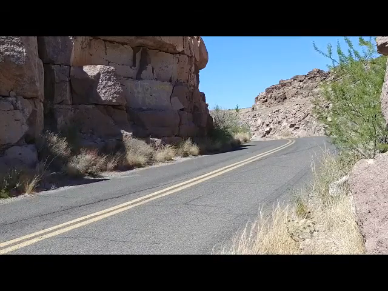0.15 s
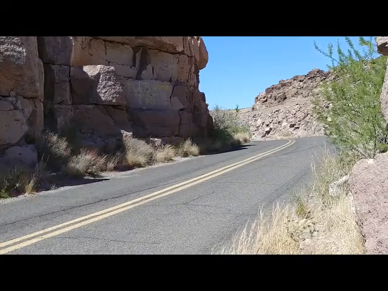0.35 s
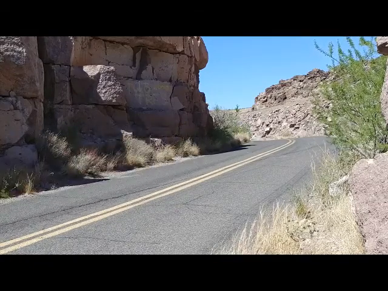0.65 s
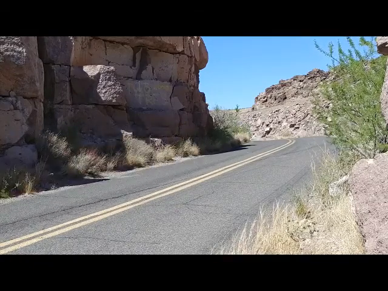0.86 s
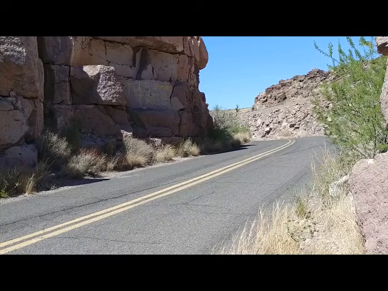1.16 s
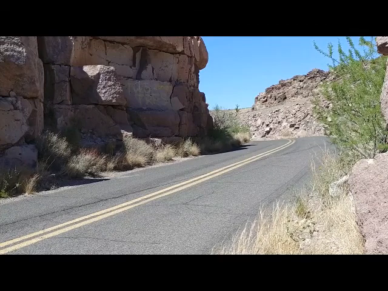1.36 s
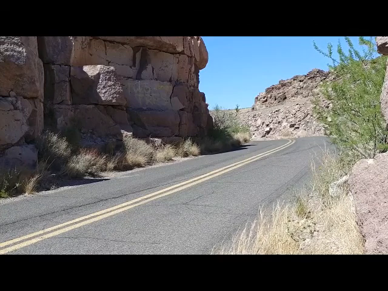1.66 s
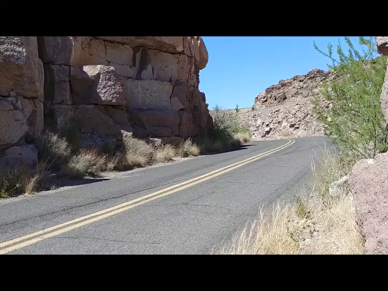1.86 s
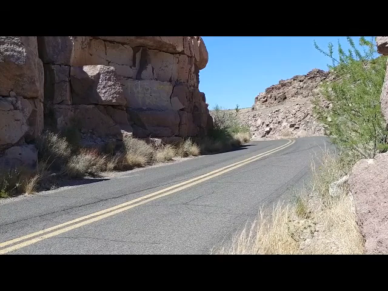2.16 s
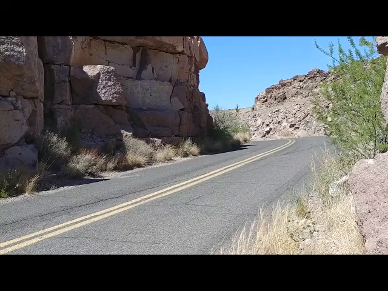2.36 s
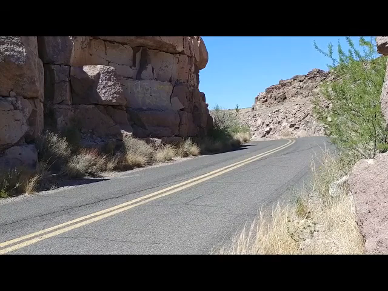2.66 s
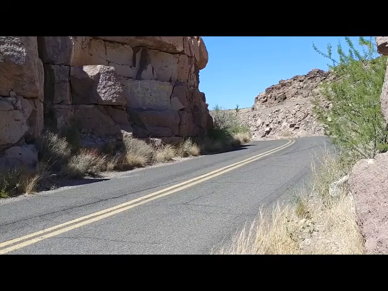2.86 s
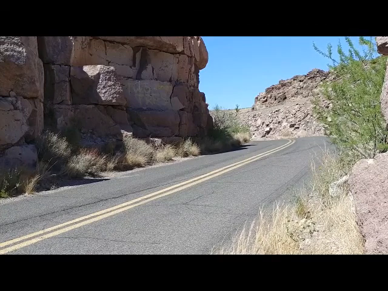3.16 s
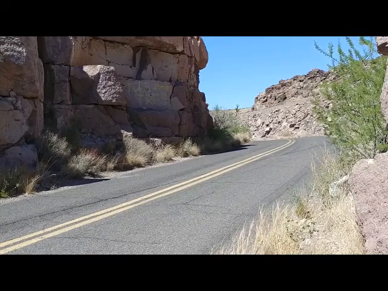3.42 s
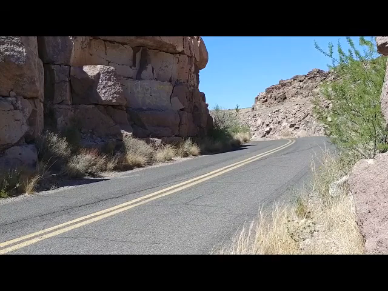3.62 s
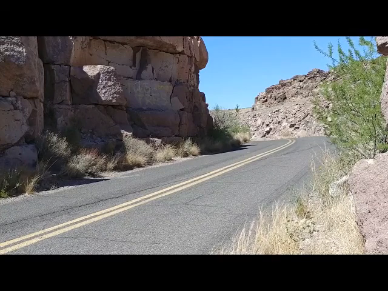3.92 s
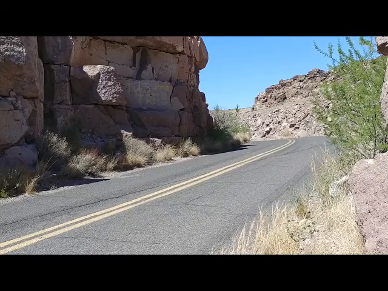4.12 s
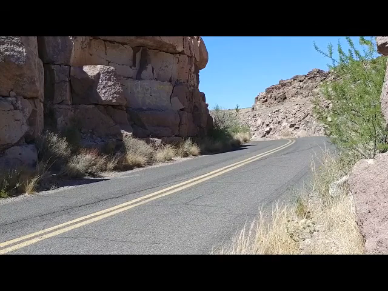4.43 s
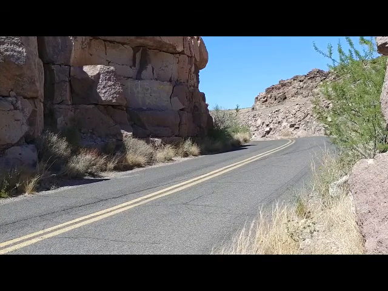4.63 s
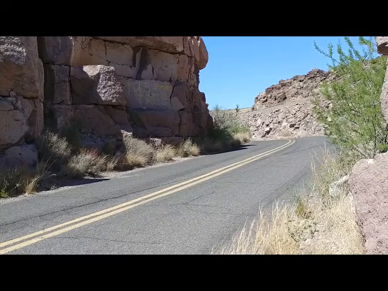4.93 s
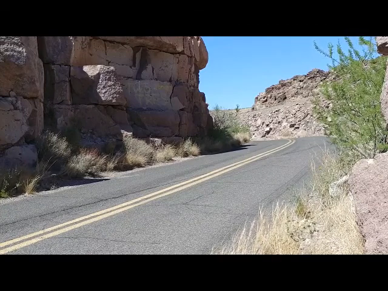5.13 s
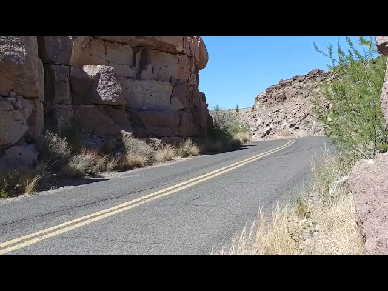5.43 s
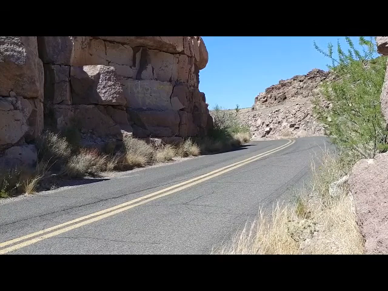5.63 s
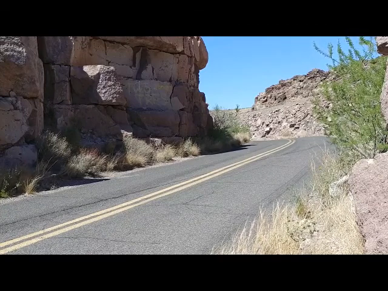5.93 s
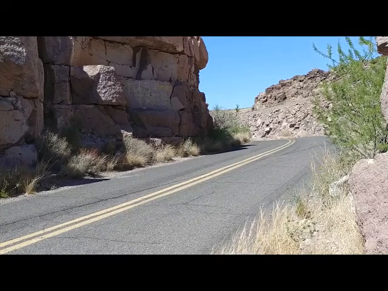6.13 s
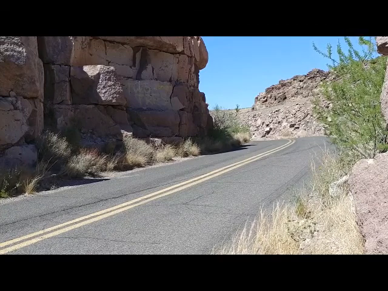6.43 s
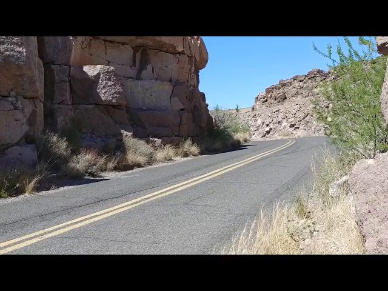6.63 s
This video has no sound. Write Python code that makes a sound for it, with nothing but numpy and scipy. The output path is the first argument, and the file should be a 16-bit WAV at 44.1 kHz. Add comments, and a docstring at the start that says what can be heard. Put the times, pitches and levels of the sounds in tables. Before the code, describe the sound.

Loud open-pipe small bike passes, chugging and rattling off throttle, cracks four echoing backfires between rock walls, then fades to soft putts and microphone wind buffeting.

```python
"""A small single-cylinder bike with an open pipe passes close by on a canyon road and rolls away.
Under throttle each firing pulse makes the pipe bark; the throttle shuts with a spit of the intake.
It coasts past: suction pulses chug in the pipe, valves and teeth rattle the case, a sharp tick sounds.
Unburnt fuel backfires four times with cracks, rasp and roar that the rocks throw back.
Soft lone firings then putter on far off, while low-frequency gusts buffet the left microphone."""
import sys
import numpy as np
from scipy import signal
from scipy.fft import rfft, irfft, next_fast_len
from scipy.io import wavfile

SR = 44100
rng = np.random.default_rng(int(sys.argv[2]) if len(sys.argv) > 2 else 0)


def pcm_store(signal):
    """Save signal as 16-bit PCM."""
    levels = np.round(np.clip(np.atleast_2d(signal), -1, 1) * 32767)
    wavfile.write(sys.argv[1], SR, levels.astype(np.int16).T)


N = 298998
TIME = np.arange(N) / SR
SIZE = next_fast_len(N + SR, real=True)
HZ = np.maximum(np.arange(SIZE // 2 + 1) * SR / SIZE, 1)

# All levels are relative: further gains follow in the functions.
# engine speed, near steady then running down: t/s, rate/cycles per s
SPEED = [(0, 42.35), (.58, 43.05), (.68, 40.3), (1.45, 38.54), (2.05, 36.1), (2.5, 32.92), (3.3, 29.2),
         (4.3, 24.06), (6.78, 21)]
# effort under throttle: t/s, bark level/dB, hiss level/dB
DRIVE = [(.17, -10, -21), (.36, -20, -32.5), (.62, -19, -35.5)]
# backfires: t/s, crack level/dB, roar level/dB, rasp level/dB, hot pipe f/Hz
BACKFIRES = [(2.159, -8, -12.5, -24.5, 800), (2.4522, -4, -14.5, -29, 800),
             (2.703, -17.5, -20.5, -44, 1030), (2.9152, -6, -14, -25.5, 920)]
# last pocket of fuel after the big bang: t/s, level/dB
AFTER_THUMPS = [(2.9815, -5)]
# lone far firings as the engine falls to idle: t/s, level/dB
PUTTS = [(3.893, -27), (4.3, -31), (4.431, -40), (4.563, -36), (4.703, -33.5), (4.898, -35), (5.145, -39),
         (5.286, -34.5), (5.384, -46), (5.497, -37), (5.61, -43.5)]
# gust peaks: t/s, level/dB
GUSTS = [(4.118, -21.5), (4.3, -35), (4.529, -16.5), (4.98, -19.5), (5.268, -19.5), (5.55, -23.5),
         (6.15, -44), (6.559, -28), (6.731, -23)]
# rock echo against direct sound: t/s, level/dB
ROCK_ECHO = [(0, -9.5), (1.2, -6.5), (3.7, -7), (4.4, 0.5)]
# far rock faces answering the backfires: delay/s, level/dB
FAR_ECHOES = [(.1, -15), (.3, -21), (.42, -13), (.6, -19)]
# radiation of each part: facing t/s, level/dB, loss per distance doubling/dB, loss behind rock/dB
CHUG_BEAM = (1.5, -13.5, 9.5, 21)
RING_BEAM = (1.38, -11.5, 13, 11.5)
CLATTER_BEAM = (1.78, -19.5, 12.5, 12)
HISS_BEAM = (1.11, -25, 10.5, 2)
# pipe modes under throttle, upper and deepest: f/Hz, width/Hz, level/dB
BARK_MODES = [(495, 56, 6.5), (578, 28, -2)]
BARK_DEEP_MODE = [(373, 35, 6.8)]
# engine case and pipe wall modes: f/Hz, width/Hz, level/dB
CLATTER_MODES = [(838, 173, 13.5), (1284, 100, 20), (1470, 110, 12.5), (1746, 100, 16.5), (1950, 42, 5.5),
                 (2430, 350, 3.5), (2910, 220, 8), (3240, 210, -10)]
# pipe wall buzz mode: f/Hz, width/Hz, level/dB
BUZZ_MODES = [(2420, 370, 0)]
# spectrum of the firing crack under load: f/Hz, level/dB
BARK_CRACK = [(80, -14.5), (220, 3), (580, 0.5), (780, -9.5), (1130, 2), (1450, -2.5), (1950, -11.5),
              (2850, -34), (6000, -43)]
# spectra of the coasting chug, near and far: f/Hz, level/dB
CHUG_NEAR = [(30, -20), (70, -12), (110, -2), (155, 1.5), (215, -7), (330, -2.5), (480, -3), (750, -37),
             (1500, -56.5)]
CHUG_FAR = [(35, -40.5), (75, -14), (115, 4.5), (165, 2), (210, -2.5), (265, -0.5), (310, -26),
            (430, -23.5), (620, -17), (740, -21.5), (800, -30.5), (1500, -54)]
# spectrum of the coasting pipe ring: f/Hz, level/dB
PIPE_RING = [(150, -32.5), (300, -30), (385, 11.5), (450, 3.5), (560, 3.5), (680, -17), (900, -18),
             (2000, -72)]
# spectrum of the clatter from behind: f/Hz, level/dB
FAR_CLATTER = [(700, -7), (1100, 5.5), (1300, -6), (1550, 4.5), (1750, -6), (2150, -10.5), (2600, -25.5),
               (3300, -17.5), (4500, -45), (7000, -37.5), (9000, -33.5)]
# spectrum of chain and tyre hiss: f/Hz, level/dB
HISS = [(2000, 2), (3300, -0.5), (4500, -2.5), (5800, -0.5), (7100, -6), (8400, 2.5), (9600, 1.5),
        (10700, -16), (12000, -8.5), (15500, -14)]
# spectrum of the sharp bright tick: f/Hz, level/dB
TICK = [(2000, -18), (7000, -3), (16000, 0)]
# spectra of backfire crack, roar and rasp: f/Hz, level/dB
CRACK = [(40, -21.5), (120, 2.5), (300, 1), (550, -6.5), (1000, -17), (3000, -25), (5000, -67.5),
         (9000, -33.5), (11500, -69.5)]
ROAR = [(80, -14), (250, 3.5), (550, 18), (900, 1), (1400, -16), (3000, -24.5), (4500, -41.5), (11000, -65)]
POP_RASP = [(500, -26), (1200, 1), (2100, 0.5), (3200, -4.5), (4500, -19.5), (7200, -23.5), (9500, -14),
            (11000, -52)]
# spectrum of the lone firings: f/Hz, level/dB
PUTT = [(60, 2.5), (200, 10.5), (310, -6), (430, 3), (580, 7), (740, -17), (950, -8.5), (1300, -33.5),
        (2200, -46), (4000, -67)]
# spectrum of the far rock faces: f/Hz, level/dB
FAR_ECHO_COLOUR = [(300, -6.5), (900, -9.5), (1600, 1), (2300, -4), (2800, -10.5), (4500, -22)]
# spectra of wind buffet and still air: f/Hz, level/dB
WIND = [(20, -25.5), (45, -1), (70, 5), (120, -2), (220, -11), (330, -27.5), (700, -42.5), (2000, -80)]
AIR = [(30, -15.5), (150, 2.5), (550, -0.5), (800, -35), (4000, -35), (15000, -44)]
# lead of the left microphone: f/Hz, phase/rad
PORT_PHASE = [(40, 0), (200, .45), (620, .8), (950, 2.8), (1720, 4.2), (2500, 6.3), (3450, 11), (16000, 51)]

# wind
GUST_RISE_S, GUST_FALL_S = 0.052, 0.075
BREEZE_RISES_S, BREEZE_RISE_TAKES_S = 3, 0.71
BREEZE_DB, BREEZE_FADE_DB_PER_S, BREEZE_DROPS_S = -30.5, 6, 4.98
# canyon; bangs carry to farther rocks and ring longer
CANYON_T60_S, CANYON_DULL_HZ = 0.41, 2967
BANG_ECHO_DB, BANG_T60_S, BANG_DULL_HZ = -5.5, 0.43, 3580
# time to cover the closest distance; later a rock shoulder hides the bike
PASS_WIDTH_S, HIDDEN_FROM_S, HIDING_TAKES_S = 0.86, 3.9, 1.77
# rider and frame screen the hiss from behind
HISS_SCREEN_DB, SCREEN_FROM_S, SCREEN_TAKES_S = 21, 2.5, 0.17
TICK_S, TICK_DB = 1.439, -10
# lone firings settle into an even beat
IDLE_FROM_S, IDLE_PERIOD_S, IDLE_DB = 5.715, .14, -43.5
# engine
THROTTLE_SHUT_S, FIRST_CYCLE = .655, .262
DRIVE_CHUG_DB, DRIVE_CLATTER_DB = -31, -47.5
# intake spit as the throttle snaps shut
SNAP_DB, SNAP_FALL_S = -23, 0.0062
TOP_DULLS_S, TOP_DULLING_TAKES_S = 1.8, 0.1
SPIT_IN_HISS, CLACK_IN_HISS = 2.8, 3.8
BUZZ_DB, BUZZ_FACING_S, BUZZ_WIDTH_S, BUZZ_FALL_S = -32.5, 1.83, 0.24, .0035
SPIT_IN_RATTLE, CLACK_IN_RATTLE, VALVE_KNOCK, TEETH_SHARE = 2.9, 6.5, 5.3, 1.15
ROAD_DULL_HZ = 2300
# moving air makes the far clatter flutter
FLUTTER_DB, FLUTTER_PER_S = 2.5, 14
# treble dip after each backfire
HUSH_DB, HUSH_AFTER_S, HUSH_WIDTH_S = 8, 0.061, 0.025
# backfires
BURN_PEAK_S, BURN_WIDTH_S, BURN_TAIL, BURN_TAIL_S, PIPE_TONE = 0.025, .016, 0.2, 0.055, 0.95
THUMP_DULL_HZ, COOL_PIPE_HZ = 700, 500
PIPE_RETURN_S = .0077
# boom at twice the firing rate
BOOM_FROM_S, BOOM_UNTIL_S, BOOM_EDGE_S = 1.48, 3.07, 0.1347
BOOM_DB, BOOM_SAG_DB_PER_S, BOOM_OFF_AXIS_DB, BOOM_LEAD_RAD = -15.5, 8.5, -30, .5
# bark
DEEP_EASES_DB, DEEP_EASES_S = 10.5, 0.36
BARK_CRACK_DB, CRACK_SWING_HZ = -23, 1100
BARK_UNEVEN_DB, BARK_UNEVEN_PER_S = 1.4, 30
# rock face answering the bark as the bike draws nearer
FACE_DB, FACE_FROM_S, FACE_TAKES_S, FACE_DULL_HZ = -9.5, .2, .2, 700
FACE_DELAY_S, FACE_CLOSES_S_PER_S = .0143, .0018
# pulses and wake; the lowest pipe mode drones between chugs
WAKE_STEADY, WAKE_FALL_S, WAKE_DB, PULSE_TOP_HZ, CLEAN_BELOW_HZ = 0.85, 0.0023, -31, 3060, 190
DRONE_HZ, DRONE_WIDTH_HZ, DRONE_DB = 168.3, 28, -4.5
# rocks draw far chugs out, higher tones arriving later
FAR_SMEAR_S_PER_HZ = .000012
# gain control on mean power
LIMIT_DB, LIMIT_WINDOW_S, LIMIT_RELEASE_DB_PER_S = -9.5, 0.0064, 89


def from_db(db):
    """Decibels to gain."""
    return 10 ** (np.asarray(db) / 20)


def rms_one(x):
    """Scale to unit power."""
    return x / np.sqrt(np.mean(x ** 2) + 1e-20)


def in_time(rows):
    """Each column of a curve at every sample."""
    s, *columns = np.transpose(rows)
    return [np.interp(TIME, s, c) for c in columns]


def ramp(start_s, length_s):
    """Rise from 0 to 1 over `length_s`."""
    return np.clip((TIME - start_s) / length_s, 0, 1)


def filtered(x, response):
    """Apply a frequency response."""
    return irfft(rfft(x, SIZE) * response, SIZE)[..., :N]


def colour(points):
    """Causal (minimum-phase) response with the given spectrum."""
    hz, db = np.transpose(points)
    log_gain = np.log(from_db(np.interp(np.log(HZ), np.log(hz), db)))
    cepstrum = irfft(log_gain, SIZE)
    cepstrum[1:SIZE // 2] *= 2
    cepstrum[SIZE // 2 + 1:] = 0
    return np.exp(rfft(cepstrum))


def resonances(modes):
    """Response of damped modes side by side."""
    return sum(from_db(db) / (1 + 1j * (HZ ** 2 - hz ** 2) / (HZ * width)) for hz, width, db in modes)


def low_pass(hz):
    """First-order low-pass response."""
    return 1 / (1 + 1j * HZ / hz)


def without_bass(x):
    """Turbulence leaves the lowest firing orders clean: second-order high-pass."""
    return filtered(x, (1j * HZ / (CLEAN_BELOW_HZ + 1j * HZ)) ** 2)


def delayed(x, delay_s):
    """Both channels under a time-varying delay."""
    return np.array([np.interp(TIME - delay_s, TIME, side) for side in x])


def drift(rate_hz):
    """Smooth random curve around 0, spread about 1."""
    return np.interp(TIME * rate_hz, np.arange(N // 20), rng.standard_normal(N // 20))


def stereo_noise(apart):
    """White noise, partly shared by the two channels."""
    return rms_one(rng.standard_normal(N) + apart * rng.standard_normal((2, N)))


def puff(age_s, rise_s, decay_s):
    """Envelope that swells and dies away."""
    age_s = np.maximum(age_s, 0)
    return (1 - np.exp(-(age_s / rise_s) ** 2)) * np.exp(-age_s / decay_s)


def strokes(turns, speed, delay_s, uneven_db):
    """Once a cycle, `delay_s` after its start: a click, the time since then, that cycle's strength."""
    late = turns - delay_s * speed + 2
    cycle = late.astype(int)
    strength = from_db(uneven_db * rng.standard_normal(N // 100))[cycle]
    clicks = np.diff(cycle, prepend=cycle[0]) * strength
    return clicks, late % 1 / speed, strength


def passing(beam):
    """Level in dB of one part as it comes near, draws away and goes behind the rock."""
    facing_s, level_db, doubling_db, hidden_db = beam
    distance = np.hypot(1, (TIME - facing_s) / PASS_WIDTH_S)
    return level_db - doubling_db * np.log2(distance) - hidden_db * ramp(HIDDEN_FROM_S, HIDING_TAKES_S)


def loudness(throttle):
    """Chug, ring, clatter and hiss in dB: by effort under throttle, by distance when coasting."""
    bark_db, spit_db = in_time(DRIVE)
    driven = DRIVE_CHUG_DB, bark_db, DRIVE_CLATTER_DB, spit_db
    screen_db = HISS_SCREEN_DB * ramp(SCREEN_FROM_S, SCREEN_TAKES_S)
    coasting = passing(CHUG_BEAM), passing(RING_BEAM), passing(CLATTER_BEAM), passing(HISS_BEAM) - screen_db
    return [throttle * on + (1 - throttle) * off for on, off in zip(driven, coasting)]


def wind():
    """Low noise gusts rise quickly out of a light breeze, strongest on the left; still air lies below."""
    gusts = sum(
        from_db(db) * np.exp(-np.maximum((s - TIME) / GUST_RISE_S, (TIME - s) / GUST_FALL_S))
        for s, db in GUSTS)
    breeze = from_db(BREEZE_DB - BREEZE_FADE_DB_PER_S * np.maximum(TIME - BREEZE_DROPS_S, 0))
    breeze = breeze * ramp(BREEZE_RISES_S, BREEZE_RISE_TAKES_S)
    buffet = rms_one(filtered(stereo_noise(apart=0.11), colour(WIND))) * from_db([[-.5], [-13]])
    buffet *= np.clip((TIME[-1] - TIME) * 20, 0, 1)   # fades out over the last 0.05 s
    air = rms_one(filtered(stereo_noise(apart=0.65), colour(AIR)))
    return (gusts + breeze) * buffet + from_db(-52.0) * air


def far_echoes(x):
    """Separate thin, late echoes from across the canyon."""
    delays = sum(from_db(db) * np.exp(-2j * np.pi * HZ * s) for s, db in FAR_ECHOES)
    return filtered(x, delays * colour(FAR_ECHO_COLOUR))


def canyon(x, t60_s, dull_hz):
    """Scattered dull echoes from the rock faces, partly shared by the channels."""
    sparse = (rng.random(N) < 700 / SR) * (TIME > .01)   # 700 per s, after 10 ms
    echoes = stereo_noise(apart=2.5) * sparse * from_db(-60 * np.minimum(TIME / t60_s, 3))
    echoes /= np.sqrt(np.sum(echoes ** 2, axis=1, keepdims=True))
    return filtered(x, rfft(echoes, SIZE) * low_pass(dull_hz))


def tick():
    """A sharp bright tick, a millisecond burst of noise."""
    burst = from_db(TICK_DB) * puff(TIME - TICK_S, rise_s=0.00025, decay_s=0.0015)
    return burst * rms_one(filtered(stereo_noise(apart=0.797), colour(TICK)))


def putts():
    """At idle the engine catches only every few cycles; the rocks smear each firing into a soft puff."""
    idle = [(s, IDLE_DB) for s in np.arange(IDLE_FROM_S, TIME[-1], IDLE_PERIOD_S)]
    firings = list(PUTTS) + idle
    swell = sum(from_db(db) * puff(TIME - s, rise_s=0.0041, decay_s=0.093) for s, db in firings)
    return from_db(-2.0) * swell * rms_one(filtered(stereo_noise(apart=0.47), colour(PUTT)))


def chain_hiss(spit, clack):
    """Chain and tyre noise, strengthened by gas spits and valve clacks."""
    strokes_gain = 1 + SPIT_IN_HISS * spit + CLACK_IN_HISS * clack
    hiss = stereo_noise(apart=1.0) * from_db(1.5 * drift(300)) * strokes_gain
    hiss = rms_one(filtered(hiss, colour(HISS)))
    # the hiss is duller from here on, most of all above 10 kHz
    dulling = filtered(hiss, colour([(9700, -6.5), (11000, -22.5)]) - 1)
    return hiss + ramp(TOP_DULLS_S, TOP_DULLING_TAKES_S) * dulling


def pipe_buzz(teeth, valve_age_s, valve_strength):
    """The pipe wall buzzes briefly after each valve stroke, heard as the bike draws level."""
    drive = teeth * valve_strength * puff(valve_age_s, rise_s=.0005, decay_s=BUZZ_FALL_S)
    buzz = rms_one(filtered(drive, resonances(BUZZ_MODES) * low_pass(4000)))
    facing = np.exp(-((TIME - BUZZ_FACING_S) / BUZZ_WIDTH_S) ** 2)
    return buzz * from_db(BUZZ_DB) * facing


def case_clatter(teeth, spit, clack, knocks, away):
    """Noise, gear teeth and valve knocks shake the modes of case and pipe wall; the road reflects them."""
    rattle = stereo_noise(apart=1.2) * from_db(1.5 * drift(250)) + TEETH_SHARE * teeth
    rattle = rattle * (1 + SPIT_IN_RATTLE * spit + CLACK_IN_RATTLE * clack)
    near = rms_one(filtered(rattle + knocks, resonances(CLATTER_MODES) * low_pass(6000)))
    # road bounce lags most at the closest point and sweeps a comb through the rasp
    lag_s = 0.002182 / np.hypot(1, (TIME - 1.5) / 1.3)
    bounce = filtered(near, 1 / (1 + (HZ / ROAD_DULL_HZ) ** 4))
    near = rms_one(near + .5 * delayed(bounce, lag_s))
    # dull from behind and far off
    far = 0.41 * rms_one(filtered(rattle, colour(FAR_CLATTER)))
    clatter = (1 - away) * near + away * far
    return clatter * from_db(away * FLUTTER_DB * drift(FLUTTER_PER_S))


def hush():
    """Gain of the treble, which dips briefly after each backfire."""
    dips = sum(np.exp(-((TIME - s - HUSH_AFTER_S) / HUSH_WIDTH_S) ** 2) for s, *_ in BACKFIRES)
    return from_db(-HUSH_DB * dips)


def mechanics(turns, speed, throttle, clatter_db, hiss_db):
    """Gas spits at each firing; when coasting a valve clacks instead. Chain and tyres hiss throughout."""
    away = ramp(2.295, 0.52)
    _, fire_age_s, fire_strength = strokes(turns, speed, delay_s=-0.0033, uneven_db=2)
    clicks, valve_age_s, valve_strength = strokes(turns, speed, delay_s=.0037, uneven_db=1.5)
    valve = (1 - throttle) * (1 - .85 * away)
    spit = throttle * fire_strength * puff(fire_age_s, rise_s=0.0014, decay_s=0.0048)
    clack = valve * valve_strength * puff(valve_age_s, rise_s=.0004, decay_s=.0013)
    # teeth meet in the same uneven pattern every turn: fine lines in the rasp
    pattern = rms_one(irfft(np.exp(2j * np.pi * rng.random(401))))
    teeth = np.interp(turns % 1, np.linspace(0, 1, len(pattern)), pattern)
    clatter = case_clatter(teeth, spit, clack, VALVE_KNOCK * clicks * valve, away)
    hiss = chain_hiss(spit, clack)
    snap = from_db(SNAP_DB) * puff(TIME - THROTTLE_SHUT_S, rise_s=0.00079, decay_s=SNAP_FALL_S)
    treble = from_db(clatter_db - 5.5 - 4.6 * throttle) * clatter + (from_db(hiss_db) + snap) * hiss
    return pipe_buzz(teeth, valve_age_s, valve_strength) + hush() * treble


def backfires():
    """Unburnt fuel cracks off in the pipe, rasps and roars on; the pipe tone sinks as it cools."""
    cracks, thumps, flame, rasp, tone = np.zeros((5, N))
    for s, crack_db, roar_db, rasp_db, hot_hz in BACKFIRES:
        age_s = np.maximum(TIME - s, 0)
        cracks[round(s * SR)] = from_db(crack_db)
        heat = np.exp(-((age_s - BURN_PEAK_S) / BURN_WIDTH_S) ** 2) * (age_s > 0)
        burn = from_db(roar_db) * (heat + BURN_TAIL * puff(age_s, rise_s=.002, decay_s=BURN_TAIL_S))
        flame += burn
        rasp += from_db(rasp_db) * (puff(age_s, rise_s=.0015, decay_s=.025) + .45 * heat)
        pitch_hz = COOL_PIPE_HZ + (hot_hz - COOL_PIPE_HZ) * np.exp(-((age_s - .022) / .016) ** 2)
        pitch_hz = pitch_hz * (1 + .04 * drift(260))
        tone += burn * np.sin(2 * np.pi * np.cumsum(pitch_hz) / SR)
    for s, thump_db in AFTER_THUMPS:
        thumps[round(s * SR)] = from_db(thump_db)
    # overpressure, then suction and its return along the pipe
    pipe_return = 1 + .7 * np.exp(-2j * np.pi * HZ * PIPE_RETURN_S)
    shock = 1 - 1.3 * np.exp(-2j * np.pi * HZ * .0013) * pipe_return
    body = 45 * colour(CRACK)
    crack = filtered(cracks, body * shock) - filtered(thumps, body * low_pass(THUMP_DULL_HZ) ** 2)
    roar = flame * rms_one(filtered(stereo_noise(apart=1.0), colour(ROAR)))
    rough_noise = stereo_noise(apart=1.0) * from_db(4 * drift(350))
    rasp = rasp * rms_one(filtered(rough_noise, colour(POP_RASP)))
    return crack + roar + rasp + PIPE_TONE * tone


def boom(turns):
    """Twice the firing rate: swells as the pipe's mouth swings round, sags, fades in a seventh of a second."""
    facing = ramp(BOOM_FROM_S, BOOM_EDGE_S)
    on_axis_db = BOOM_DB - BOOM_SAG_DB_PER_S * (TIME - BOOM_FROM_S)
    gain = from_db(facing * on_axis_db + (1 - facing) * BOOM_OFF_AXIS_DB)
    gain = gain * (1 - ramp(BOOM_UNTIL_S - BOOM_EDGE_S, BOOM_EDGE_S))
    return -gain * np.cos(4 * np.pi * turns + BOOM_LEAD_RAD)


def barking(clicks, pulses, growl_db):
    """Each loaded firing cracks and sets the pipe growling; a rock face answers between the firings."""
    # deepest resonance eases as the engine unloads
    deep = from_db(-DEEP_EASES_DB * ramp(DEEP_EASES_S, 0.18)) * filtered(pulses, resonances(BARK_DEEP_MODE))
    growl = rms_one(filtered(deep + filtered(pulses, resonances(BARK_MODES)), low_pass(1500)))
    growl = from_db(growl_db) * growl
    # a short push, then a deep suck
    swing = (CRACK_SWING_HZ - 1j * HZ) / (CRACK_SWING_HZ + 1j * HZ)
    crack = from_db(BARK_CRACK_DB) * rms_one(filtered(-clicks, colour(BARK_CRACK) * swing))
    # no two firings burn alike
    bark = growl * from_db(BARK_UNEVEN_DB * drift(BARK_UNEVEN_PER_S)) + crack
    back = filtered(bark, low_pass(FACE_DULL_HZ))
    answer = from_db(FACE_DB) * ramp(FACE_FROM_S, FACE_TAKES_S)
    echo = answer * delayed(back, FACE_DELAY_S - FACE_CLOSES_S_PER_S * TIME)
    return (bark + echo) / np.hypot(1, answer)


def chugging(pulses, throttle, chug_db, ring_db):
    """Suction pulses excite the pipe; from far behind the bass thins and one resonance stands alone."""
    # the pulse runs down the pipe and comes back once
    pipe_echo = 1 + .55 * np.exp(-2j * np.pi * HZ * PIPE_RETURN_S)
    chug = from_db(chug_db - 2.0) * rms_one(filtered(pulses, colour(CHUG_NEAR) * pipe_echo))
    ring = from_db(ring_db - 3.5) * rms_one(filtered(pulses, colour(PIPE_RING) * pipe_echo))
    drone_mode = resonances([(DRONE_HZ, DRONE_WIDTH_HZ, 0)])
    drone = from_db(chug_db + DRONE_DB) * rms_one(filtered(pulses, drone_mode))
    smear = np.exp(-1j * np.pi * FAR_SMEAR_S_PER_HZ * HZ ** 2)
    far_chug = from_db(chug_db - 0.4) * rms_one(filtered(pulses, colour(CHUG_FAR) * smear))
    far_mode = resonances([(437.7, 30, 6.5)]) * low_pass(1200)
    far_ring = from_db(ring_db - 3.5) * rms_one(filtered(pulses, far_mode))
    away = ramp(2.55, .5)
    near = chug + (1 - throttle) * (ring + drone)
    return np.sqrt(1 - away) * near + np.sqrt(away) * (far_chug + far_ring)


def exhaust(turns, speed, throttle, chug_db, ring_db):
    """A pressure pulse a cycle with a turbulent wake: a bark under load, a hollow suck when coasting."""
    clicks, age_s, strength = strokes(turns, speed, delay_s=-.0011, uneven_db=.7)
    flow = WAKE_STEADY * (1 - throttle / 2) + puff(age_s, rise_s=0.0013, decay_s=WAKE_FALL_S)
    wake = stereo_noise(apart=0.86) * strength * flow
    pulses = filtered(from_db(WAKE_DB) * without_bass(wake) - clicks, low_pass(PULSE_TOP_HZ) ** 2)
    bark = barking(clicks, pulses, ring_db)
    return throttle * bark + chugging(pulses, throttle, chug_db, ring_db) + boom(turns)


def scene():
    """The bike, its echoes, a tick and the wind."""
    speed, = in_time(SPEED)
    turns = FIRST_CYCLE + np.cumsum(speed) / SR
    throttle = np.clip((THROTTLE_SHUT_S - TIME) / 0.054 + .5, 0, 1)
    chug_db, ring_db, clatter_db, hiss_db = loudness(throttle)
    engine = exhaust(turns, speed, throttle, chug_db, ring_db)
    engine = engine + mechanics(turns, speed, throttle, clatter_db, hiss_db)
    wet = from_db(in_time(ROCK_ECHO)[0])
    engine /= np.hypot(1, wet)
    pops = backfires()
    echoes = canyon(wet * engine, CANYON_T60_S, CANYON_DULL_HZ)
    echoes = echoes + from_db(BANG_ECHO_DB) * canyon(pops, BANG_T60_S, BANG_DULL_HZ)
    late = far_echoes(canyon(pops, CANYON_T60_S, BANG_DULL_HZ))
    left, right = engine + pops + putts() + tick() + echoes + late
    right = filtered(right, np.exp(-1j * np.interp(HZ, *np.transpose(PORT_PHASE))))
    return from_db(3.0) * np.array([left, right]) + wind()


def limited(x):
    """Gain control: ducks on loud bursts and recovers at a steady rate."""
    keep = np.exp(-1 / (LIMIT_WINDOW_S * SR))
    power = signal.lfilter([1 - keep], [1, -keep], np.mean(x ** 2, axis=0))
    over_db = np.maximum(10 * np.log10(power + 1e-12) - LIMIT_DB, 0)
    release_db = LIMIT_RELEASE_DB_PER_S * TIME
    return x * from_db(release_db - np.maximum.accumulate(over_db + release_db))


def record(dry):
    """Loud bursts are turned down, the highest peaks are rounded off and the top is cut."""
    x = limited(dry)
    rounded = x / (1 + (x / 1.05) ** 6) ** (1 / 6)
    top_cut = signal.cheby2(16, 70, 16600, fs=SR, output="sos")   # 70 dB down from 16600 Hz
    return signal.sosfilt(top_cut, rounded)


dry = scene()
out = record(dry)
pcm_store(out)
```